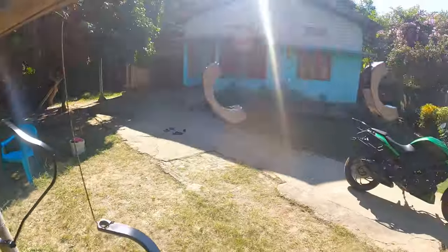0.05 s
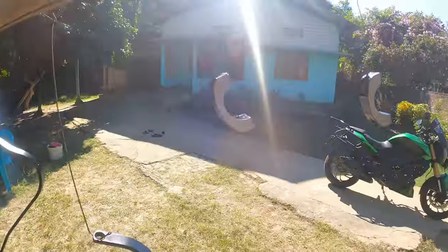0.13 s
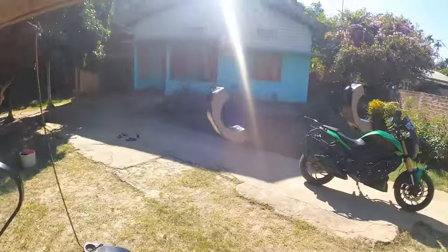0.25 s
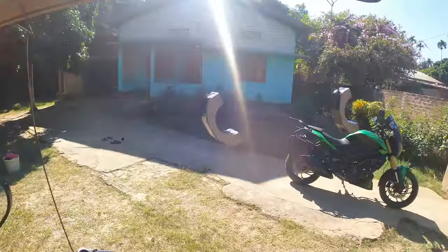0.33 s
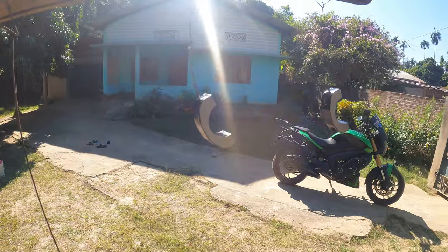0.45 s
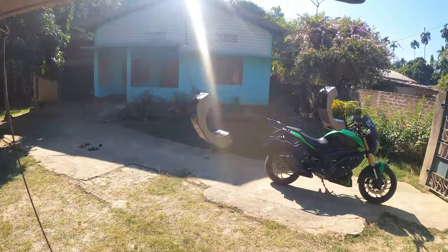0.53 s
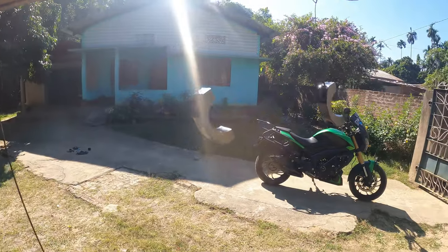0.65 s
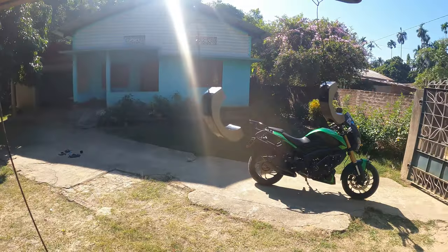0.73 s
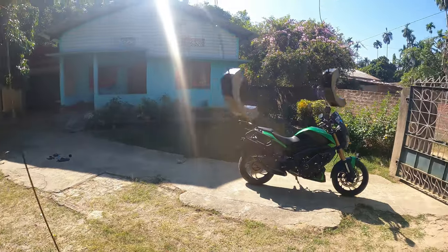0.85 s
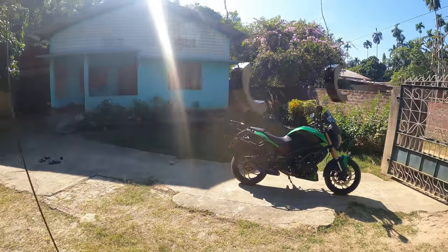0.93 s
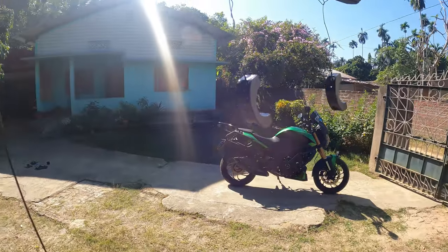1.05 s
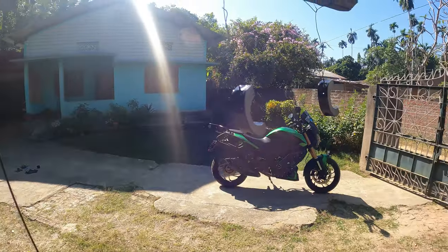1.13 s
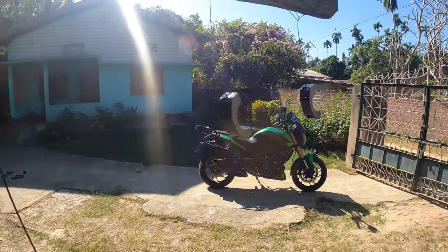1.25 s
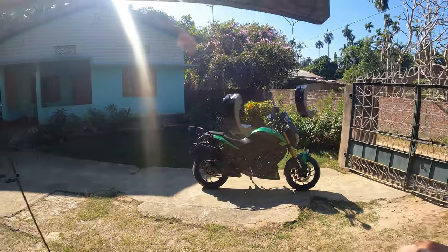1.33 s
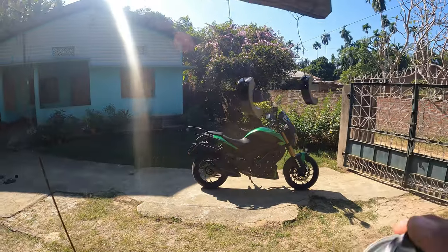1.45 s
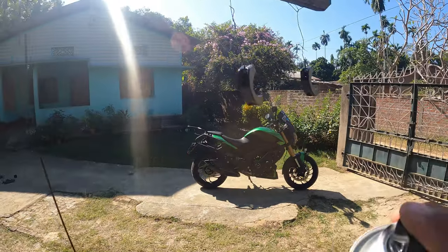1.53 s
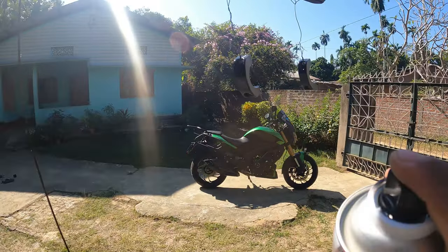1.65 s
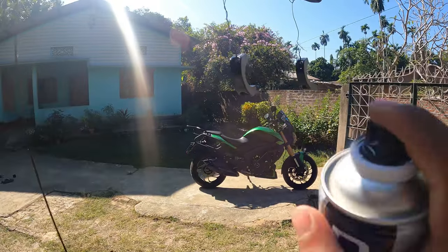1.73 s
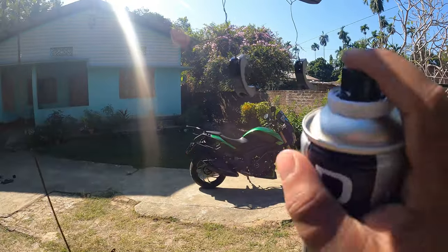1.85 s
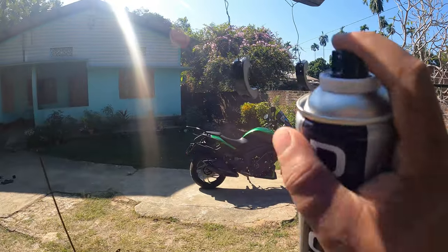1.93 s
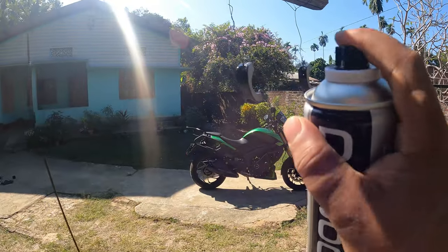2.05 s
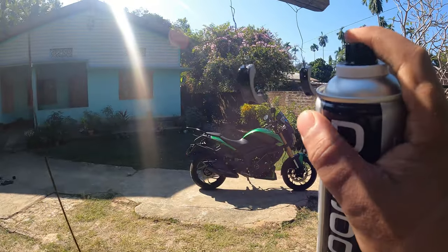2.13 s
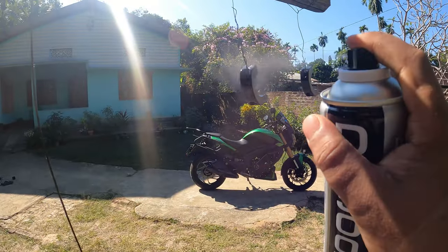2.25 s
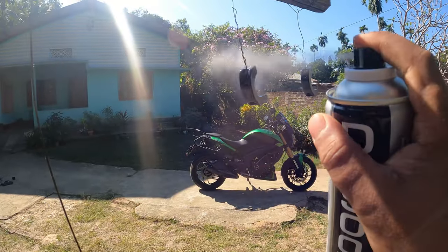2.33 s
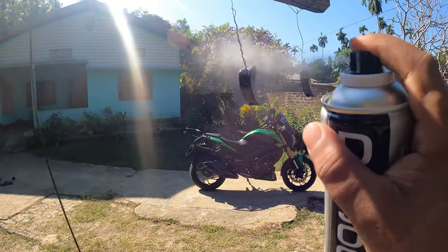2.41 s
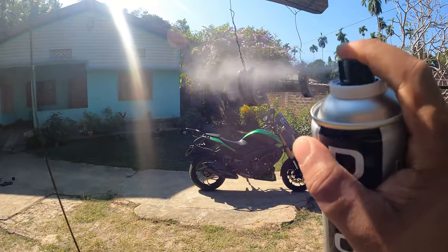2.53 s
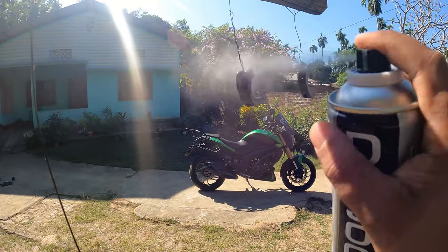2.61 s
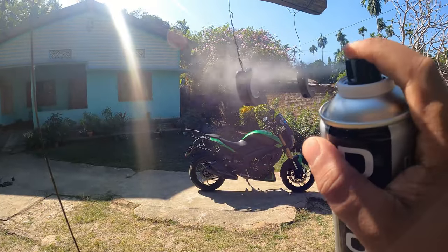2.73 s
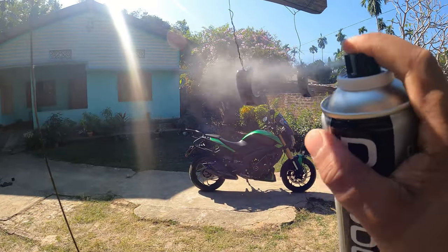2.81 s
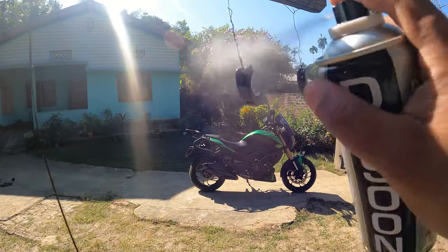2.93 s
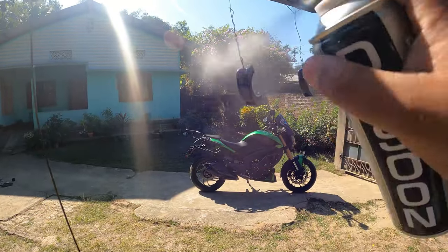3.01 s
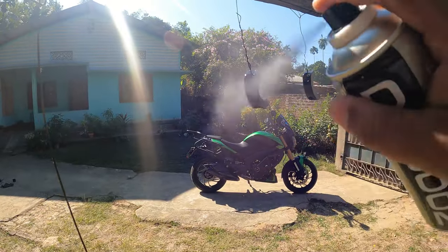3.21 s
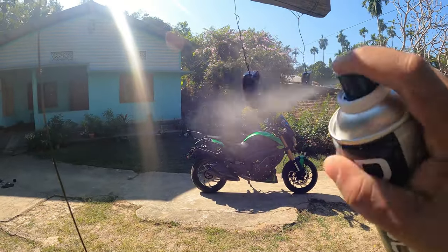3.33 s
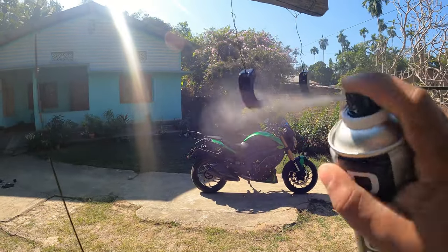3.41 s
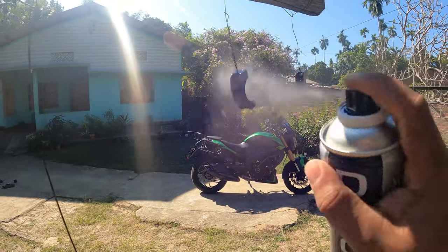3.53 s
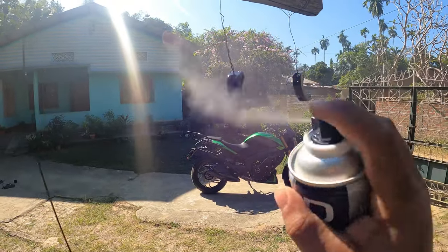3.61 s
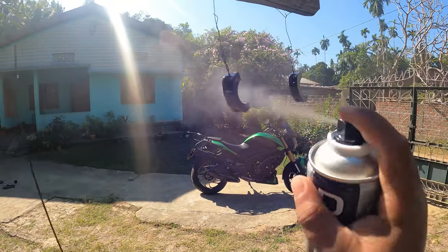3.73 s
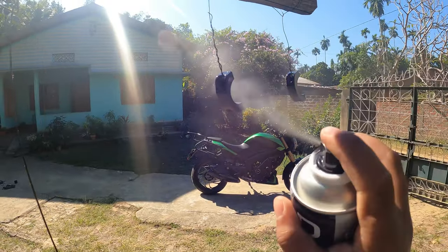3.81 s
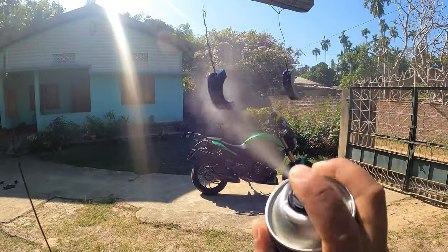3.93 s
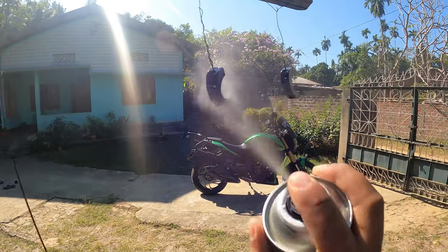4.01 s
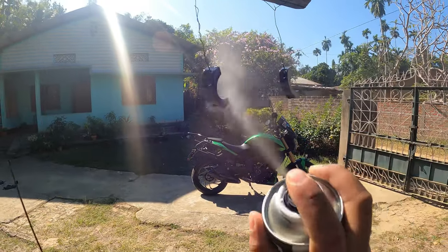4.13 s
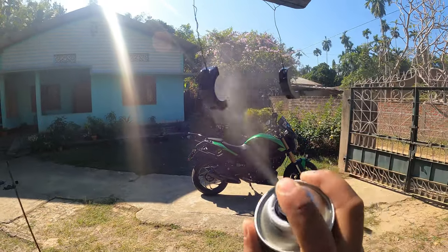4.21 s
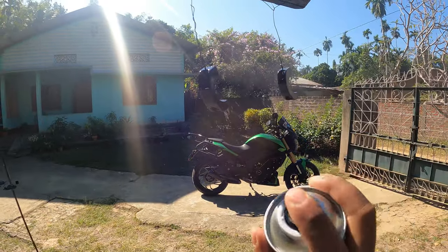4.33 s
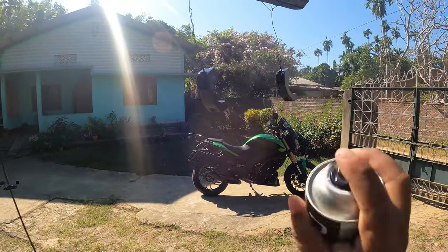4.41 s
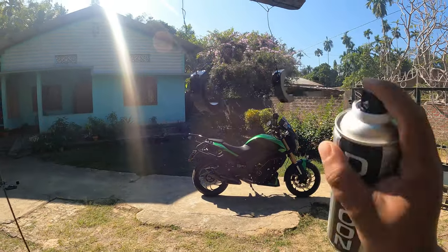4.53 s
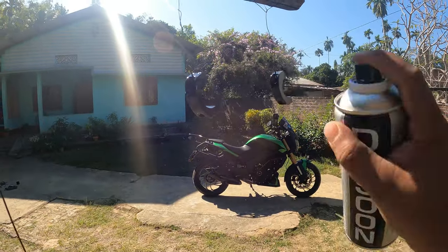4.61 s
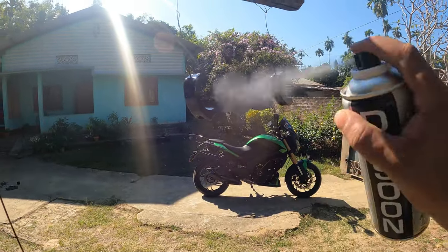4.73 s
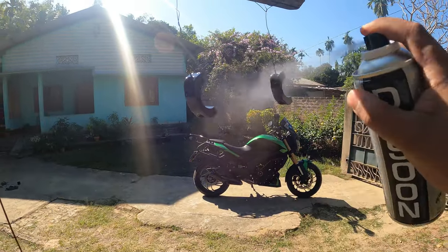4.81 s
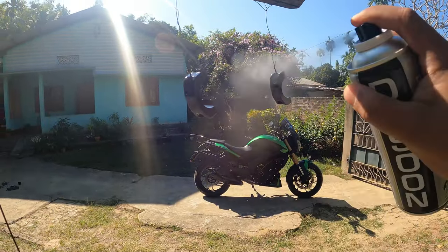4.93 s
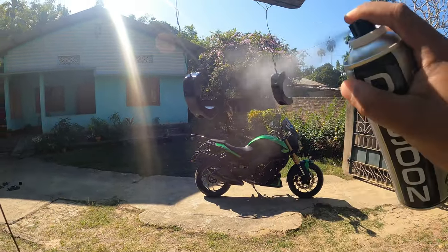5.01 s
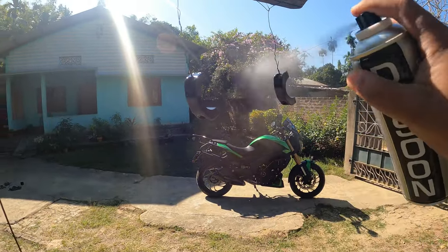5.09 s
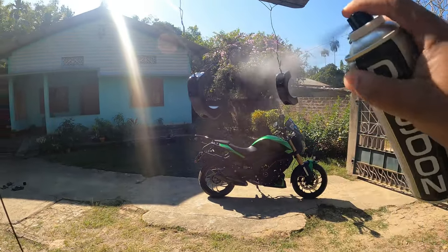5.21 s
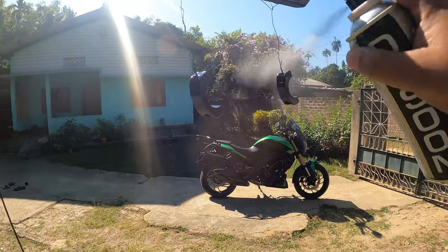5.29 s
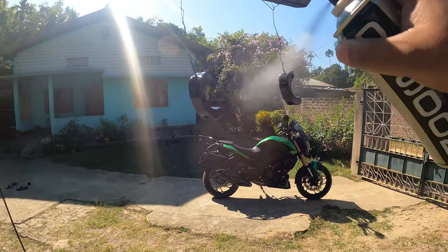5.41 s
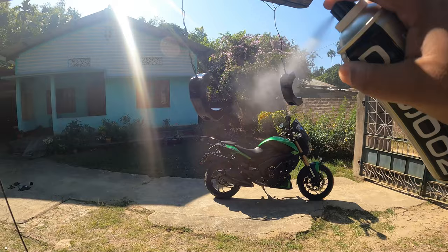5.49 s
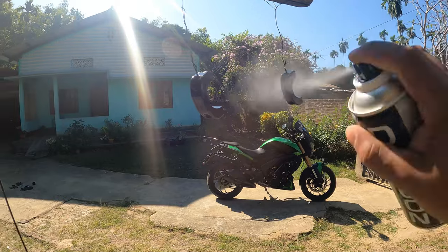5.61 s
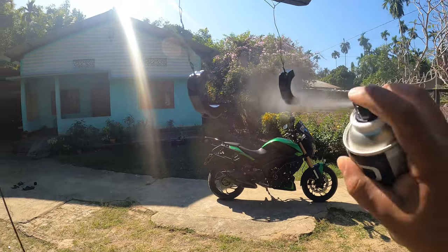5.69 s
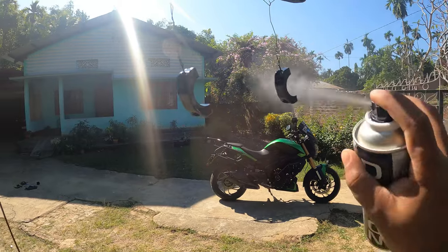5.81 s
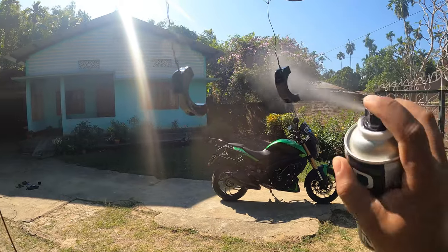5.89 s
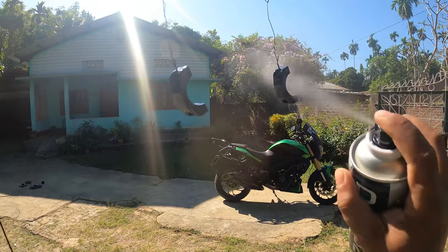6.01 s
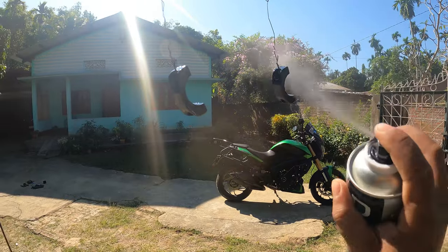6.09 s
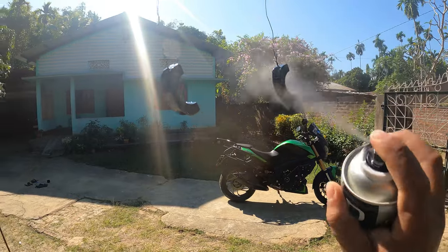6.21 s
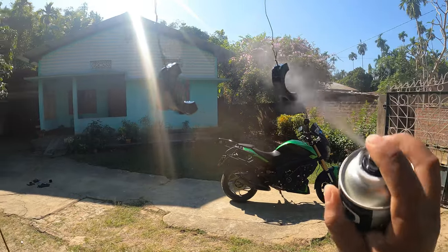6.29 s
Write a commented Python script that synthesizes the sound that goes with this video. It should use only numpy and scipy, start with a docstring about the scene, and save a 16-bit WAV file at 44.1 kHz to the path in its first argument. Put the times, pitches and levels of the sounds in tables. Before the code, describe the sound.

A spray can's mixing ball rattles briefly, then paint hisses out close by in two long bursts in a quiet yard.

```python
"""In a quiet yard, filtered noise makes a distant wash, a brief low hoot and puffs of wind,
while swells of noise and grains make the faint rustle and crunch of feet and clothes.
A spray can is lifted: its ball strikes damped modes of the can, rolls over them and jolts the hand.
Paint then hisses out in two long bursts of banded noise and droplets, with a short rattle between them;
the can is held close to two microphone ports and swept about, which shifts the colour of the jet."""
import sys
import numpy as np
from scipy import signal
from scipy.fft import rfft, irfft
from scipy.io import wavfile
from scipy.ndimage import uniform_filter1d

SR = 44100
rng = np.random.default_rng(int(sys.argv[2]) if len(sys.argv) > 2 else 0)


def digitize_waveform(pressure):
    """Quantize a signal to 16-bit integers and store it at the path in sys.argv[1].

    Rows of a 2-D input are taken as channels; values are limited to [-1, 1].
    """
    field = np.atleast_2d(pressure).T
    bounded = np.clip(field, -1, 1)
    quanta = np.round(bounded * 32767).astype(np.int16)
    wavfile.write(sys.argv[1], SR, quanta)


N = 280029
TIME, FREQ = np.arange(N) / SR, np.fft.rfftfreq(N, 1 / SR)

# Modes of the paint-filled can. Each row: frequency in Hz, relative level in dB when struck at the end,
# relative level in dB when struck on the wall, t60 in seconds.
CAN_MODES = [(563, -27.5, -34, .008), (1090, -25, -17, 0.014), (1603, -20, 3, 0.017),
             (2130, -24, -6.5, 0.019), (2505, -5.5, -11.5, 0.024), (2764, 1.5, -16, 0.021),
             (2974, 1.5, -7, .018), (3580, -8, -0.5, .016), (3990, -6, -7, 0.016), (4320, -5.5, -11, 0.021),
             (5060, -7.5, -15, 0.011), (5420, -1.5, -5, .014), (5830, -2, -8, 0.015), (6450, -8, -13, .014),
             (6710, -7, -18, 0.023), (7230, -14, -17, .018), (7850, -15, -22, 0.02),
             (10000, -20, -27, .016), (11300, -27.5, -31.5, .016)]
# Limits of the five bands of the jet (roar, rush, edge, hiss, fizz). Each entry: frequency in Hz.
JET_BAND_EDGES = [20, 1300, 3200, 4900, 8800, 20000]


def amp(db):
    """Level law: a gain is ten to the power of decibels over twenty."""
    return 10 ** (np.asarray(db) / 20)


def evened(x):
    """Normalisation by mean power: scales to rms 1."""
    return x / np.sqrt(np.mean(x ** 2) + 1e-20)


def read(points, hz=FREQ):
    """Interpolation on a logarithmic frequency axis between (Hz, value) points."""
    f, value = np.transpose(points)
    return np.interp(np.log(hz + 1), np.log(f + 1), value)


def bells(rows):
    """Superposition in dB of bell-shaped peaks and hollows, each at half its dB at the edges of its width."""
    return sum(db * .5 ** ((2 * (FREQ - hz) / width) ** 2) for hz, width, db in rows)


def noise(gain):
    """Spectral shaping: white noise with the given gain over frequency, at rms 1."""
    return evened(irfft(rfft(rng.standard_normal(N)) * gain, N))


def wander(rate_hz):
    """Low-passed noise: a random control of rms 1 whose spectrum falls to half at the given rate."""
    return noise(1 / (1 + (FREQ / rate_hz) ** 2))


def add(mix, s, sound):
    """Linear superposition: mixes a sound in at time s."""
    part = mix[max(round(s * SR), 0):][:len(sound)]
    part += sound[:len(part)]


def grains(gain, per_s, spread_db):
    """Shot noise: tiny random impacts of very uneven size, coloured by the gain, at rms 1."""
    size = amp(spread_db * np.minimum(rng.exponential(1, N), 4))
    size = size * rng.choice([-1, 1], N)
    struck = rng.random(N) < per_s / SR
    return evened(irfft(rfft(size * struck) * gain, N))


def swells(rows):
    """Addition of powers: gain of soft swells, each some 12 dB down at the ends of its length."""
    power = sum(amp(db) ** 2 / (1 + (2 * (TIME - s) / length) ** 2) ** 4 for s, db, length in rows)
    return np.sqrt(power)


def resonate(x, hz, width):
    """Heterodyne resonator: a one-pole filter in a rotating frame follows the curve hz, with peak gain 1."""
    turn = np.exp(2j * np.pi * np.cumsum(hz) / SR)
    r = np.exp(-np.pi * width / SR)
    return 2 * (turn * signal.lfilter([1 - r], [1, -r], x / turn)).real


def yard(swell_db=1.54, hoot_hz=345, hoot_db=-43):
    """Broadband ambience: a slowly swelling distant wash, low-frequency wind puffs and a brief low hoot."""
    # Spectrum of the wash. Each row: frequency in Hz, relative level in dB per Hz.
    wash_colour = [(25, -22), (50, -12.5), (90, -8), (170, -.5), (280, -2), (420, -5), (680, -6),
                   (950, -11.5), (1300, -10.5), (2800, -15.5), (4200, -22.5), (6500, -28), (8700, -40),
                   (15000, -56)]
    # Mean level of the wash, about which it swells. Each row: time in seconds, level in dB.
    wash_level = [(0, -51.5), (1.3, -51.5), (2.3, -52.5), (4.5, -55.5)]
    # Puffs of wind on the microphone. Each row: centre in seconds, level in dB, length in seconds.
    puffs = [(.84, -54, .07), (.955, -53, .06), (1.04, -59, .12)]
    wash_db = np.interp(TIME, *np.transpose(wash_level)) + swell_db * wander(3)
    wash = amp(wash_db) * noise(amp(read(wash_colour)))
    wind = noise(amp(read([(20, -8), (55, 1.5), (110, -2), (250, -8), (600, -42.5)])))
    out = wash + wind * swells(puffs)
    t = np.arange(SR // 20) / SR
    add(out, .16, amp(hoot_db) * np.hanning(len(t)) * np.sin(2 * np.pi * hoot_hz * t))
    return out


def rustle(level_db=-.3, grain_db=-2):
    """Friction as many small impacts: cloth and dry grass swish with grains and a few sharper crunches."""
    # Spectrum of the rustle. Each row: frequency in Hz, relative level in dB per Hz.
    rustle_colour = [(300, -20), (900, -4), (1500, -2.5), (2200, -2), (2700, 1), (3300, -2), (4500, -5.5),
                     (7000, -14), (8000, -18), (11000, -25.5), (15000, -49)]
    # Clothes and feet on dry grass. Each row: centre in seconds, relative level in dB, length in seconds.
    swishes = [(.04, -53, .14), (.16, -46.5, .22), (.45, -51.5, .2), (.62, -47, .2), (1.205, -50, .13),
               (1.52, -55, .13), (1.63, -50.5, .2), (2.1, -57.5, .5)]
    # Crunches and small ticks. Each row: start in seconds, relative level in dB, centre in Hz, t60 in seconds.
    crunches = [(.063, -50, 7000, .02), (.3985, -29.5, 4800, .03), (.442, -42, 4500, .03),
                (.5795, -33, 2800, .035), (.611, -32, 3300, .02), (.630, -31, 1700, .03),
                (.643, -32, 2800, .018), (.666, -40, 2500, .02), (1.183, -28.5, 2400, 0.047)]
    colour = amp(read(rustle_colour))
    swish = evened(noise(colour) + amp(grain_db) * grains(colour, per_s=700, spread_db=5))
    out = swish * amp(level_db) * swells(swishes)
    t = np.arange(SR // 8) / SR
    for s, db, hz, t60 in crunches:
        octaves_off = np.log2((FREQ + 1) / hz)
        snap = noise(colour / (1 + octaves_off ** 2) ** 2)[:len(t)]
        add(out, s, snap * amp(db - 5 - 60 * t / t60))
    return out


def rattle(hand_db=-11, level_db=-11.5, uneven_db=2.5, detune=0.017, rise_s=0.00043,
           crack_db=-10, crack_t60=.013, crack_hz=6800, ring_db=-32, ring_t60=.06):
    """Modal excitation: each hit of the ball rings the can; paint and hand damp it within milliseconds."""
    # The mixing ball hits the can. Each row: start in seconds, relative level in dB,
    # place from 0 = stiff end to 1 = soft side wall, hardness in dB per octave.
    ball_hits = [(1.3930, -31.5, .02, -7), (1.6759, -3.5, 0.011, -2), (1.699, -30, .1, -3),
                 (1.7478, -27, 0.067, -8), (1.7894, -3, 0, -4), (1.8166, -18, 0.037, 0),
                 (1.8283, -2.5, 0.91, -2.5), (1.8687, -16, 0.00099, 0), (1.8720, -4, 0, -0.5),
                 (1.9605, -5.5, 0, 2), (2.0162, -6, 1, -3), (2.0342, -5, 0.38, 1), (2.0720, -11, 0.76, -3),
                 (2.1105, -5.5, 0.31, 0.5), (2.1257, -10.5, 0.98, -1.5), (2.1717, -8, 0.66, 3),
                 (2.1752, -10, 0.83, 0), (2.196, -14.5, 0.62, 4), (2.22, -17.5, .45, 3.5),
                 (2.2374, -21, 0.7, 3), (2.2539, -10, 0.68, 0), (2.3108, -18.5, .9, -4),
                 (4.6850, -15, .03, .5), (4.6985, -9.5, 0, 1), (4.7160, -23, .05, -2)]
    hz, end_db, wall_db, t60 = np.transpose(CAN_MODES)[:, :, None]
    t, out = np.arange(SR // 8) / SR, np.zeros(N)
    crack_band = signal.butter(3, [900, crack_hz], "bandpass", fs=SR, output="sos")
    for s, db, place, hardness in ball_hits:
        place = np.clip(place, 0, 1)
        unevenness, shift, phase, late_phase = rng.standard_normal((4, len(CAN_MODES), 1))
        weight = np.sqrt((1 - place) * amp(end_db) ** 2 + place * amp(wall_db) ** 2)
        weight = weight * amp(hardness * np.log2(hz / 3000) + uneven_db * unevenness)
        angle = 2 * np.pi * hz * (1 + detune * shift) * t  # sloshing paint shifts the modes
        damped = np.sin(angle + np.pi * phase) * amp(-60 * t / t60)
        dry_metal = np.sin(angle + np.pi * late_phase) * amp(ring_db - 60 * t / ring_t60)
        ring = (weight * (damped + dry_metal)).sum(0) / np.linalg.norm(weight)
        crack = evened(signal.sosfilt(crack_band, rng.standard_normal(len(t))))
        crack = crack * amp(crack_db - 60 * t / crack_t60)
        hit = (ring + crack) * (1 - np.exp(-(t / rise_s) ** 2))
        # the hand sends a near copy back, a little differently each time
        delay_s = rng.uniform(.0002, 0.000707)
        hit = hit + amp(hand_db) * np.interp(t - delay_s, t, hit, left=0)
        first_rms = np.sqrt(np.mean(hit[:SR // 200] ** 2))  # over the first 5 ms
        add(out, s, amp(db + level_db) * hit / first_rms)
    return out


def rolling(tilt_db=-7):
    """Random excitation of modes: a rolling ball knocks in a dense stream and sets narrow rings singing."""
    # The ball rolls and skitters. Each row: start in seconds, end in seconds,
    # level in dB at the start, level in dB at the end.
    rolls = [(1.645, 1.68, -54, -48), (1.672, 1.788, -41, -56), (1.80, 1.90, -44, -53),
             (2.256, 2.283, -45, -52), (4.697, 4.754, -37.5, -38.5)]
    # Narrow rings of the can under the ball. Each row: start in seconds, end in seconds,
    # frequency in Hz, peak level in dB.
    rings = [(1.705, 1.80, 1510, -48), (4.69, 4.755, 6820, -46)]
    power = 0
    for hz, db, _, t60 in CAN_MODES:
        peak = amp(db + tilt_db * np.log2(hz / 3000)) ** 2
        power = power + peak / (1 + ((FREQ - hz) * t60 / 2.7) ** 2) ** 1.2
    skitter = grains(np.sqrt(power), per_s=1200, spread_db=2)
    gain = sum(amp(np.interp(TIME, [start, stop], [start_db, stop_db], left=-150, right=-150))
               for start, stop, start_db, stop_db in rolls)
    out = skitter * gain
    for start, stop, hz, db in rings:
        t = np.arange(0, stop - start, 1 / SR)
        add(out, start, amp(db) * signal.windows.tukey(len(t), .6) * np.sin(2 * np.pi * hz * t))
    return out


def jolt(low_hz=180, high_hz=900, start_s=1.676, level_db=-41, t60=.035):
    """Damped impact: the ball's first hard landing jolts the can in the hand with a short dull knock."""
    t, out = np.arange(SR // 8) / SR, np.zeros(N)
    band = signal.butter(2, [low_hz, high_hz], "bandpass", fs=SR, output="sos")
    knock = evened(signal.sosfilt(band, rng.standard_normal(len(t))))
    add(out, start_s, knock * amp(level_db - 60 * t / t60))
    return out


def jet_gains(tilt_db, snap_s=.008, drain_t60=.125, drain_slope=.15, crack_share=.35,
              surge_db=3, surge_s=.04, sag_db_per_s=.55):
    """Flow through a valve: a leak only hisses, an open valve roars; gives each jet band's gain over time."""
    # The finger presses the nozzle. Each row: start of the leak in seconds, fully open in seconds,
    # easing off in seconds, shut in seconds, time constant of the leak's attack in seconds,
    # brightness of roar, rush and edge in dB per octave.
    presses = [(2.302, 2.394, 4.28, 4.353, .018, 0), (4.754, 4.824, 6.4, 6.47, .032, 1.1)]
    # Treble, which the nozzle beams: one curve for each press.
    # Each row: time in seconds, relative hiss level in dB, relative fizz level in dB.
    treble_curves = [
        [(2.43, -29, -43), (2.94, -31, -46), (3.088, -36, -42), (3.124, -37, -47), (3.244, -33, -46),
         (3.33, -37, -45), (3.552, -31, -47), (3.8, -33, -46), (4.104, -31, -40), (4.28, -33, -44)],
        [(4.85, -30, -39), (4.97, -32, -38), (5.274, -33, -41), (5.504, -31, -43), (5.616, -33, -44),
         (5.69, -36, -41), (5.762, -32, -46), (5.826, -33, -42), (6.234, -28, -38), (6.3, -29, -40)],
    ]
    # Roar, rush and edge. Each row: relative level in dB, change in dB while the valve only leaks,
    # share of sag, surge and tilt.
    body_bands = [(-31.5, -13, .95), (-21.2, -11.5, 1), (-31.1, -4.5, .45)]
    # Hiss and fizz. Each row: offset from the curve in dB, change in dB while the valve only leaks.
    treble_bands = [(.7, -5), (1.8, -1.5)]
    edges = np.array(JET_BAND_EDGES)
    octaves = np.log2((edges[:-1] + edges[1:]) / (edges[1] + edges[2]))[:, None]  # band centres against the rush
    sag_db = sag_db_per_s * (TIME - presses[0][0])  # the can cools and loses pressure
    band_t60 = drain_t60 / 2 ** (drain_slope * octaves)  # the nozzle empties, treble first
    gains = 0
    for (leak_s, open_s, ease_s, shut_s, attack_s, bright_db), treble in zip(presses, treble_curves):
        # a share of the leak escapes at once when the seal cracks
        leak = (TIME > leak_s) * (1 - (1 - crack_share) * np.exp(-abs(TIME - leak_s) / attack_s))
        flow = leak * amp(-60 * np.maximum(TIME - shut_s, 0) / band_t60)
        easing = np.clip((TIME - ease_s) / (shut_s - ease_s), 0, 1) ** 2
        opening = np.clip((TIME - open_s) / snap_s + 1, 0, 1) * (1 - easing)
        # stored pressure gives each burst a stronger start
        surge = surge_db * opening * np.exp(-abs(TIME - open_s) / surge_s)
        force_db = surge - sag_db - tilt_db
        body = [db + leak_db * (1 - opening) + share * force_db + bright_db * octave
                for (db, leak_db, share), octave in zip(body_bands, octaves)]
        s, *curves = np.transpose(treble)
        top = [db + leak_db * (1 - opening) + np.interp(TIME, s, curve)
               for (db, leak_db), curve in zip(treble_bands, curves)]
        gains = gains + flow * amp(body + top)
    return gains


def jet(flutter_db=0.42, sputter_db=.6, droplets_db=-9, hollow_width=800, hollow_hz=4850,
        octaves_per_db=.165, level_depth=.13, lifted_depth=.48, smoothing_s=.33):
    """Turbulence noise: gas and bursting droplets, with beamed treble that changes as the can turns."""
    # Broad spectrum of the jet. Each row: frequency in Hz, relative level in dB per Hz.
    jet_colour = [(60, -55), (140, -24.5), (200, -14), (300, -7), (460, -13), (650, -10.5), (1150, -11.5),
                  (1800, -4), (2750, 0.5), (3200, -12.5), (7000, -12.5), (9000, -21.5), (12500, -28.5),
                  (15500, -35.5)]
    # Peaks and hollows from nozzle, can and hand. Each row: frequency in Hz, width in Hz, height in dB.
    jet_shape = [(365, 80, 1), (2200, 640, 1.5), (2790, 260, 2), (3700, 500, 3), (4830, 550, -2.5),
                 (7160, 690, 3), (7740, 380, -5), (9920, 700, 4), (10750, 500, -0.5), (11300, 550, 3),
                 (13200, 700, 5)]
    # The can is tipped up and away (weaker) or down (stronger). Each row: start in seconds,
    # tipped in seconds, turning back in seconds, level again in seconds, loss in dB.
    tilts = [(3.02, 3.13, 3.25, 3.39, 4.3), (4.8, 5.27, 5.6, 5.79, 4.3), (6.08, 6.2, 6.3, 6.45, -1.7)]
    tilt_db = sum(db * np.interp(TIME, times, [0, 1, 1, 0]) for *times, db in tilts)
    colour = amp(read(jet_colour) + bells(jet_shape))
    out = np.zeros(N)
    for lo, hi, gain in zip(JET_BAND_EDGES, JET_BAND_EDGES[1:], jet_gains(tilt_db)):
        band = colour * (FREQ >= lo) * (FREQ < hi)
        droplets = grains(band, per_s=2500, spread_db=4)
        out += gain * evened(noise(band) + amp(droplets_db) * droplets)
    # a reflection off the hand cancels a band, which glides up and deepens as the can tips away
    away_db = uniform_filter1d(np.maximum(tilt_db, 0), size=round(smoothing_s * SR))
    depth = np.interp(away_db, [0, 1], [level_depth, lifted_depth])
    out = out - depth * resonate(out, hollow_hz * 2 ** (octaves_per_db * away_db), hollow_width)
    # paint and gas reach the nozzle unevenly, which shakes the whole jet
    return out * amp(flutter_db * wander(25) + sputter_db * wander(220))


def echoes(x, wet_db=-28, t60=.2):
    """Diffuse reflection: ground, eaves and walls return a little sound as sparse decaying taps."""
    t = np.arange(SR // 3) / SR
    arrivals = (rng.random(len(t)) < 2000 / SR) * (t > .007)
    taps = rng.standard_normal(len(t)) * arrivals * amp(-60 * t / t60)
    return x + amp(wet_db) * signal.fftconvolve(x, taps / np.linalg.norm(taps))[:N]


def ports(x):
    """Partial coherence: two close microphone ports hear nearly the same, but part ways in the top treble."""
    # Likeness of the two ports. Each row: frequency in Hz, likeness from 0 to 1.
    port_likeness = [(110, 1), (200, .995), (450, .995), (1000, 1), (10800, 1), (11500, .82), (12500, .35),
                     (13500, .7), (15500, .6)]
    # Phase between the ports. Each row: frequency in Hz, lead of the left in radians.
    port_phase = [(11000, 0), (12000, 0.9), (13000, 3), (14500, 4)]
    # Balance of the ports. Each row: frequency in Hz, left over right in dB.
    port_balance = [(10900, 0), (11700, -3.5), (12500, -2), (13900, -7), (15500, -2)]
    _, _, z = signal.stft(x, nperseg=128)
    random_turn = np.exp(2j * np.pi * rng.random(z.shape))
    scattered = signal.istft(abs(z) * random_turn, nperseg=128)[1][:N]
    likeness = np.clip(read(port_likeness), 0, 1)
    right = rfft(x)
    left = likeness * right + np.sqrt(2 * (1 - likeness ** 2)) * rfft(scattered)
    lean = amp(read(port_balance) / 2) * np.exp(.5j * read(port_phase))
    return irfft(np.array([left * lean, right / lean]), N)


def scene():
    """Superposition of sources: the yard, the person moving, and the can close by with its echoes."""
    can = rattle() + rolling() + jolt() + jet()
    return ports(yard() + rustle() + echoes(can))


def record(dry):
    """Linear filtering: the microphone housing cuts a notch in the treble; then comes the band limit."""
    # Hollows that form the notch. Each row: frequency in Hz, width in Hz, height in dB.
    housing_notch = [(9100, 170, -11), (8930, 680, -5.5)]
    coloured = irfft(rfft(dry) * amp(bells(housing_notch)), N)
    coloured = coloured * np.minimum(TIME / .008, 1) ** 3  # soft start over 8 ms
    low_pass = signal.firwin(511, 15600, window=("kaiser", 9), fs=SR)  # cutoff in Hz
    return signal.oaconvolve(coloured, low_pass[None], "same", axes=1)


dry = scene()
out = record(dry)
digitize_waveform(out)
```